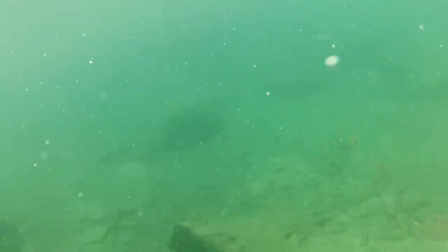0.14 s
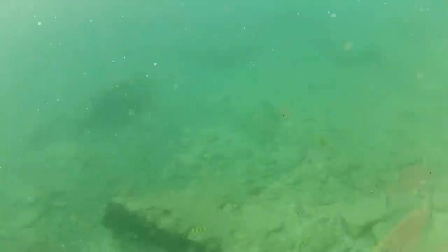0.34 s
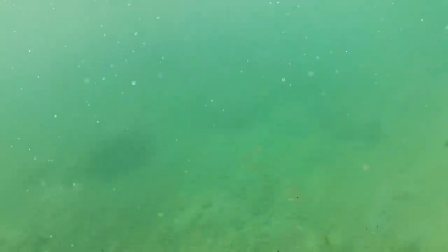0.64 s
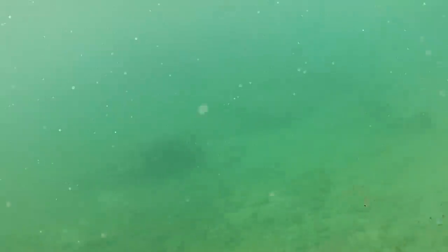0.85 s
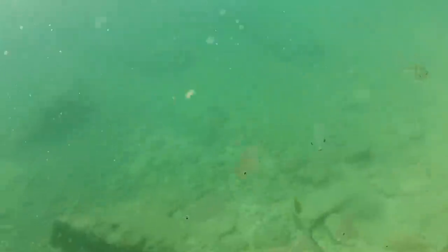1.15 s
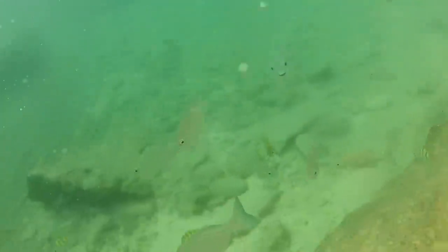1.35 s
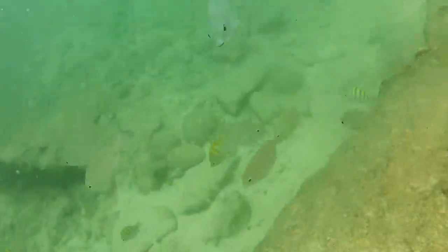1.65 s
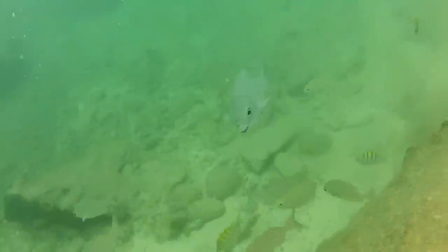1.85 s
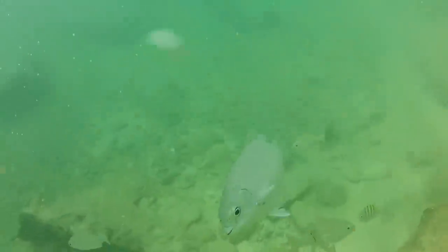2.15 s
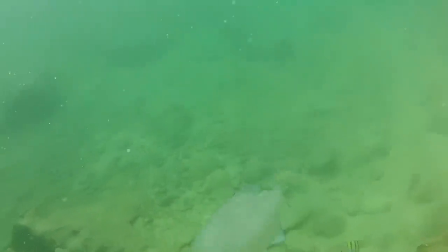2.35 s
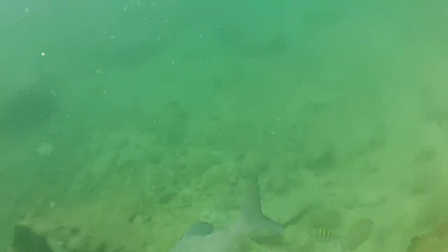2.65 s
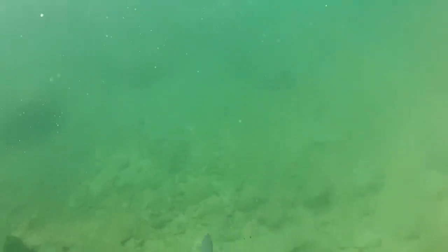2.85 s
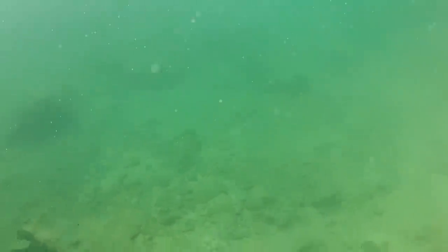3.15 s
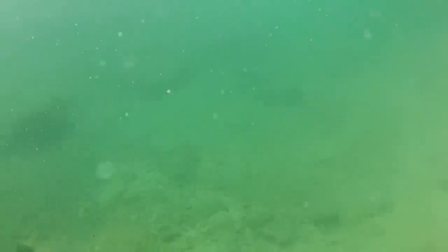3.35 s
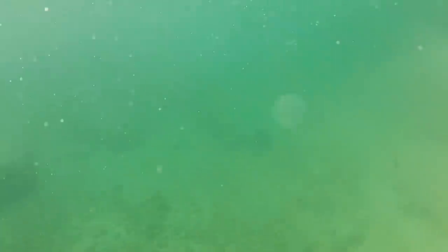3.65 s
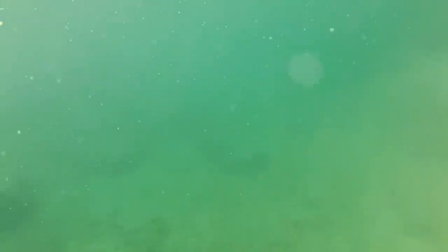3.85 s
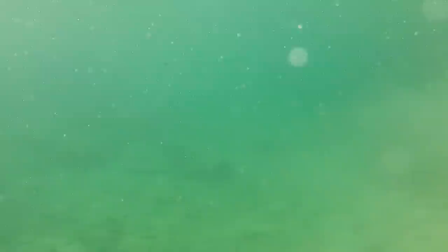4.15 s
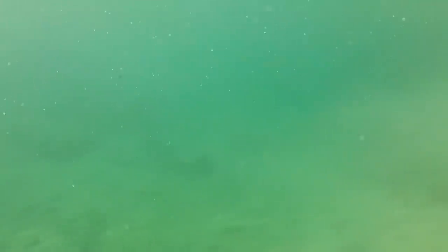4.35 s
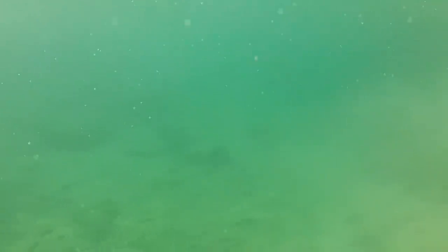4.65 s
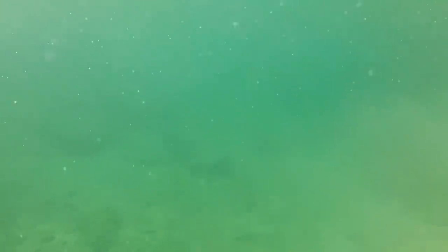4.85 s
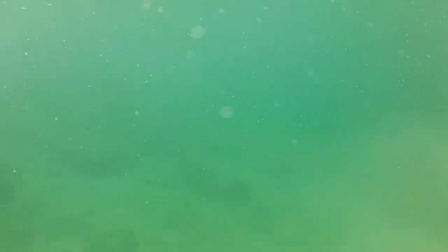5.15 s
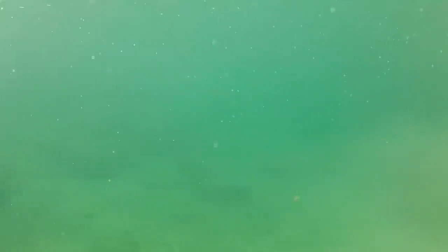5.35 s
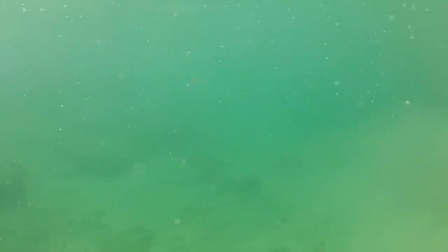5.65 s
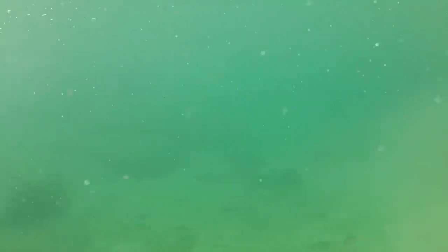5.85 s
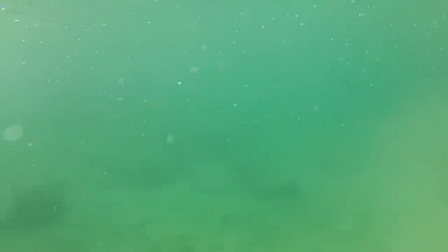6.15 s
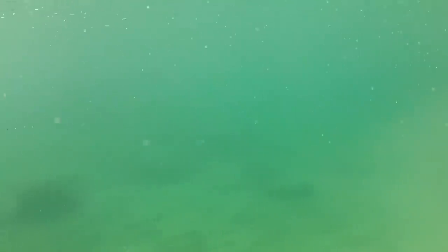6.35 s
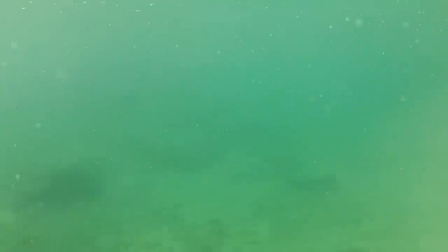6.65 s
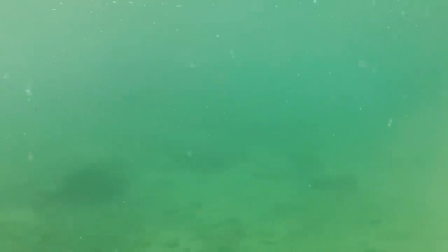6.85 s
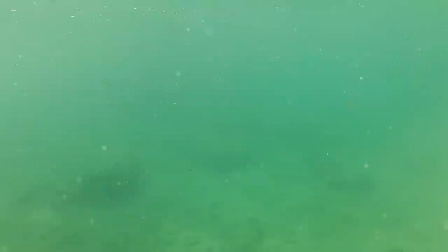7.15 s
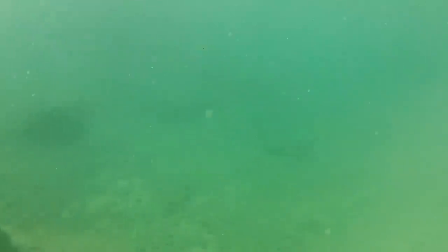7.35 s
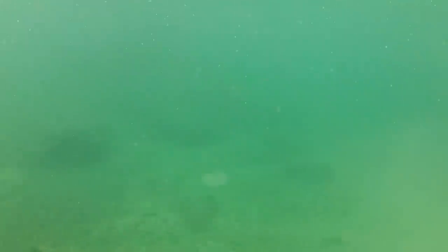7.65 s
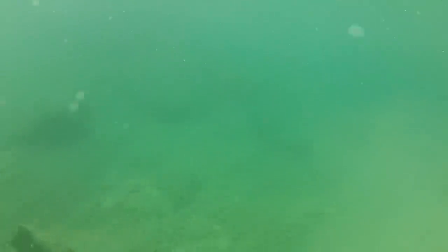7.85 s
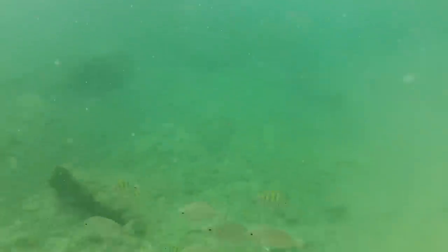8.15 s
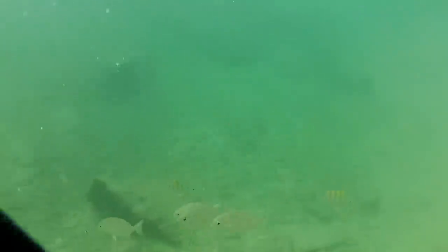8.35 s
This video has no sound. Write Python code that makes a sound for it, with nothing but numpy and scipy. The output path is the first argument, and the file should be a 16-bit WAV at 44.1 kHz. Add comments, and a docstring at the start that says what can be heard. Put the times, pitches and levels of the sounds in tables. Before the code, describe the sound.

Close, muffled handling of a sealed camera under water. Dull knocks on its plastic shell come in separate bursts, with finger rubs, tiny high ticks, brief skin squeaks and low surging water between them. A strong clatter comes near the middle, then softer bumps, and finally very loud, overloaded knocks with a hollow ringing handle. The built-in microphone sounds boxy and gritty over faint steady hiss.

```python
"""A sealed camera housing is handled under water: knocks ring its plastic shell as dying sines and a crack.
Rubbing fingers ring the same modes in uneven grains, wet skin squeaks, and a stiffer handle rings longer.
Water sloshes in low noise-driven modes, low dying sines thump, small sharp ticks snap in high rings.
Under it lies steady noise of the water and the microphone amplifier.
The recorder overloads, samples slowly and holds each value, which mirrors sound around its sampling rate."""
import sys
import numpy as np
from scipy import signal
from scipy.fft import rfft, irfft
from scipy.io import wavfile
from scipy.ndimage import uniform_filter1d

SR = 44100
rng = np.random.default_rng(int(sys.argv[2]) if len(sys.argv) > 2 else 0)


def file_out(sig):
    """Save sig as 16-bit WAV at sys.argv[1]."""
    # one column per channel
    cols = np.atleast_2d(sig).T
    # limit, then scale
    lim = np.clip(cols, -1, 1)
    pcm = np.round(lim * 32767).astype(np.int16)
    wavfile.write(sys.argv[1], SR, pcm)


N = 374409

# ringing modes of the plastic shell: pitch_hz, level_db, t60_s
SHELL = [(129.8, -2, 0.22), (250.6, -22.5, 0.14), (274.6, -1.5, 0.079), (424.7, -1, 0.067),
         (474.3, 1.5, 0.045), (564.6, -0.5, 0.066), (771.4, -2, 0.047), (975, -1, 0.062),
         (1091, 12.5, 0.028), (1257, 18, 0.015), (1690, 11.5, 0.027), (1864, 13, 0.015), (2050, 2.5, 0.025),
         (2244, 1.5, 0.048), (2505, -7.5, 0.0455), (3230, 3.5, 0.022), (3636, 0, 0.031),
         (4840, -12.5, 0.026), (5180, 0.5, 0.0076)]


def amp(db):
    """Amplitude ratio of a level in dB."""
    return 10 ** (np.asarray(db) / 20)


def evened(x):
    """Scale a signal to an RMS of one, so that a later factor sets its level."""
    return x / np.sqrt(np.mean(x ** 2) + 1e-20)


def read(points, hz):
    """Read a curve of (Hz, value) points, straight over log frequency."""
    f, value = np.transpose(points)
    return np.interp(np.log(hz + 1), np.log(f + 1), value)


def add(mix, start_s, sound):
    """Add a sound into the mix in place, cut off at its end."""
    part = mix[round(start_s * SR):][:len(sound)]
    part += sound[:len(part)]


def ring(modes, seconds, more_db=0, rise_turns=0.24, since=0):
    """Sum of dying sines; the contact is not instant, so each swells over its first rise_turns cycles."""
    hz, db, t60 = np.transpose(modes)[:, :, None]
    t = np.arange(round(seconds * SR)) / SR
    swell = np.sin(np.pi / 2 * np.minimum(hz * t / rise_turns, 1)) ** 2
    fade = amp(db + more_db - 60 * t / t60)
    return (fade * swell * np.sin(2 * np.pi * hz * (t + since))).sum(0)


def hiss():
    """Steady noise of the water and the microphone amplifier, coloured by a smooth spectrum."""
    # spectrum of the noise, relative: freq_hz, density_db (per Hz)
    colour = [(59, -27.5), (100, -10), (274, -9), (441, -23), (570, -21.5), (1040, -25.5), (2120, -27),
              (4340, -29), (5900, -36.5), (7670, -71.5), (13000, -120)]
    level_db = -67  # RMS
    spectrum = rfft(rng.standard_normal(N)) * amp(read(colour, np.fft.rfftfreq(N, 1 / SR)))
    return amp(level_db) * evened(irfft(spectrum, N))


def handling():
    """Skin slips over the shell in grains that ring its modes, damped by the grip; water rocks it below."""
    # the grip shifting and the water moving all along: time_s, rubbing_db, slosh_db
    hands = [(0.0, -63, -62), (0.3, -63, -52), (0.8, -63, -54.5), (1.0, -67, -55.5), (1.15, -55.5, -65),
             (1.41, -72.5, -54.5), (1.53, -45, -34), (1.7, -60, -47), (1.82, -65, -55), (2.04, -55.5, -62),
             (2.45, -68, -56), (3.0, -67.5, -63), (3.5, -53.5, -64), (3.8, -56.5, -58), (4.15, -66, -61),
             (4.9, -73, -63), (5.501, -64.5, -57.5), (5.9, -58.5, -60), (6.15, -76.5, -57.5),
             (6.33, -85, -63), (6.67, -60.5, -67.5), (6.82, -80, -61), (7.03, -56.5, -75),
             (7.21, -67.5, -56), (7.34, -58, -46), (7.79, -56, -51), (8.06, -61, -65)]
    # separate finger strokes: start_s, length_s, rubbing_db, grit_db
    strokes = [(0, 0.027, -54, -55.5), (0.238, 0.11, -62.5, -64.5), (0.393, 0.058, -61, -63.5),
               (0.527, 0.067, -63, -64.5), (0.732, 0.12, -53, -61.5), (1.072, 0.032, -58, -69),
               (1.246, 0.034, -62.5, -70), (1.495, 0.064, -49, -56.5), (1.639, 0.096, -41.5, -58),
               (1.715, 0.07, -39.5, -49.5), (2.573, 0.047, -57.5, -81), (3.299, 0.031, -50.5, -86),
               (3.404, 0.042, -51, -56.5), (3.538, 0.098, -37, -49.5), (4.005, 0.044, -71.5, -50.5),
               (4.376, 0.07, -60, -70.5), (5.42, .06, -60.5, -77), (5.635, 0.204, -61.5, -77),
               (5.985, 0.15, -61, -77), (7.248, 0.044, -52.5, -57.5), (7.297, 0.091, -48, -53),
               (7.427, 0.022, -62, -59.5), (7.901, 0.12, -68, -55.5)]
    # surges of water that rock the camera: start_s, length_s, slosh_db, shell_sway_db
    surges = [(0.0, 0.073, -47.5, -79), (0.3, 0.13, -60, -63), (0.75, 0.15, -44, -49),
              (0.95, 0.33, -50.5, -54.5), (1.34, 0.15, -43, -78), (1.52, .16, -55, -58),
              (2.03, 0.27, -54, -85), (3.1, 0.44, -45, -73), (3.35, 0.18, -65, -45.5),
              (3.58, 0.092, -55, -31.5), (3.73, 0.11, -48, -48), (3.84, 0.2, -64, -48),
              (4.18, 0.11, -53, -63.5), (4.36, 0.21, -54, -57), (4.95, 0.14, -56, -75.5),
              (5.08, 0.13, -71, -60), (5.43, 0.19, -68, -49.5), (5.62, 0.27, -66, -49),
              (5.98, .14, -67, -45.5), (6.24, .14, -47, -70.5), (6.46, .18, -51, -97.5),
              (6.6, 0.22, -62, -75), (6.95, 0.17, -65, -51), (7.12, 0.17, -56, -51.5),
              (7.22, 0.22, -42, -56), (7.69, 0.17, -45, -71), (7.9, 0.1, -47, -61)]
    # the camera bobbing in the water: pitch_hz, level_db, t60_s
    bobbing = [(45, -3, 0.12), (64, -6, 0.044)]
    grit_db, grit_slope = -33.5, 0.64  # grit of the grip follows its rubbing: offset + slope x rubbing
    sway_db = -12  # steady sway of the shell, under the slosh
    rub_upper_db = -3  # the palm mutes the highest of the rubbed modes
    slips_per_s = 1800

    time_s, *columns = np.transpose(hands)
    rub_db, slosh_db = (np.interp(np.arange(N) / SR, time_s, c) for c in columns)
    rub, grit = amp(rub_db), amp(grit_db + grit_slope * rub_db)
    slosh, sway = amp(slosh_db), amp(slosh_db + sway_db)
    for rows, first, second, taper in (strokes, rub, grit, .4), (surges, slosh, sway, .9):
        for start_s, length_s, first_db, second_db in rows:
            swell = signal.windows.tukey(round(length_s * SR), taper)
            add(first, start_s, amp(first_db) * swell)
            add(second, start_s, amp(second_db) * swell)

    # sparse slips of uneven strength, their level wandering slowly
    strength_db = 1.4 * np.minimum(rng.exponential(1, N), 4)
    slips = rng.standard_normal(N) * (rng.random(N) < slips_per_s / SR) * amp(strength_db)
    slips *= amp(2.5 * evened(uniform_filter1d(rng.standard_normal(N), 900)))
    water = rng.standard_normal(N)

    gripped = np.array(SHELL) * [1, 1, .6]  # the grip shortens every ring
    palm = gripped[1:7] + np.outer(gripped[1:7, 0] > 700, [0, rub_upper_db, 0])
    layers = [(rub, slips, palm), (grit, slips, gripped[7:17]), (sway, water, SHELL[:1]),
              (slosh, water, bobbing)]
    out = np.zeros(N)
    for level, drive, modes in layers:
        out += level * evened(signal.oaconvolve(drive, ring(modes, 0.57))[:N])
    return out


def ticks():
    """A snap a few milliseconds long in short high rings."""
    # sharp ticks: start_s, level_db, brightness_db, pitch_hz
    tick_list = [(0.0273, -48, -12, 2110), (0.1117, -51, -17, 2600), (0.467, -55.5, -3.5, 2180),
                 (0.6075, -56, -20, 2320), (0.984, -60, 0.5, 2550), (1.5403, -44, -2, 2170),
                 (2.0404, -50.5, -15, 2410), (3.0872, -34.5, -13, 2530), (3.414, -39, -20.5, 2020),
                 (3.5189, -54, -8, 2200), (3.706, -42.5, -9, 2510), (4.4552, -44.5, -19.5, 2670),
                 (5.6429, -24, -21.5, 2500), (6.7945, -35.5, -21.5, 2420), (7.4943, -51.5, -1.5, 2320),
                 (7.5734, -28, -28, 2290), (7.874, -51, -9.5, 2300), (7.8986, -37.5, -17, 2160),
                 (7.9487, -42.5, -11, 2150), (7.9678, -41.5, -12, 2230)]
    # rings of a tick: pitch_hz, level_db, t60_s
    tick_modes = np.array([(2290, -7, 0.03), (2540, 2, 0.018), (3430, 5, .012), (3620, 6.5, 0.0247),
                           (3890, 9, 0.0083), (4480, 4, 0.014)])
    listed_hz = 2548  # tick pitch at which the lower rings sit as listed
    out, high = np.zeros(N), tick_modes[:, 0] > 3000
    for start_s, level_db, bright_db, hz in tick_list:
        snap = .4 * rng.standard_normal(200) * amp(-60 * np.arange(200) / SR / .003)
        snap[0] = 1
        snap /= np.linalg.norm(snap)
        # pitch moves the lower rings, brightness lifts or lowers the upper ones
        modes = tick_modes * np.where(high[:, None], 1, [hz / listed_hz, 1, 1])
        rings = ring(modes, .06, np.where(high, bright_db, 0)[:, None], rise_turns=3)
        add(out, start_s, amp(level_db) * np.convolve(snap, rings))
    return out


def knocks():
    """Each blow chatters as dying re-contacts; where it lands sets which modes speak."""
    # knocks on the shell: start_s, blow_db, thud_db, upper_db, hardness_db, chatter_t60_s
    blows = [(0.521, -30, -13, -18, -37, 0.006), (0.817, -45, 28, -24, -6, 0.039),
             (1.372, -10, 3, -13, -29, 0.048), (1.425, -10, 1.5, -22, -29.5, 0.14),
             (1.587, -6, 1.5, -32, -26, 0.035), (1.607, -18, 8.5, -24, -37, 0.12),
             (2.081, -43, 6.5, -13, -17.5, 0.1), (3.617, -6.5, -13, -2, -20.5, 0.046),
             (3.632, -12, -31, -1, -18.5, 0.049), (3.757, -5.5, -2.5, 7.5, -16.5, 0.073),
             (3.772, -11, 2.5, 9, -19, 0.084), (3.822, -18, -8, -22, -28.5, 0.11),
             (3.903, -14.5, -34, -34, -34.5, 0.073), (3.993, -20, -9, 3.5, -30, 0.17),
             (4.988, -13, -5.5, -40, -26, 0.056), (5.025, -22.5, -21, -5, -25.5, 0.036),
             (5.127, -30.5, -14, -2, -25, 0.037), (5.163, -41, 13, -23.5, -24, 0.023),
             (5.185, -30.5, -6, -12, -27, 0.011), (5.208, -37, 9.5, -29, -26, 0.24),
             (5.267, -28, 2, -11, -42, 0.046), (5.442, -45.5, 14.5, -15, -37, 0.024),
             (6, -55, 26, -6, -26, 0.021), (6.259, -16.5, -0.5, -23.5, -21.5, 0.12),
             (6.279, -22.5, 3, -1, -16.5, 0.11), (6.283, -21.5, 0, -29, -43, 0.19),
             (6.511, -17, -6.5, -13, -26, 0.091), (6.562, -26.5, 3.5, -27, -31, 0.18),
             (6.652, -26.5, -5.5, -28, -31, 0.071), (6.709, -35.5, -6, -18, -30, 0.16),
             (6.773, -35, -5.5, -24, -42, 0.055), (6.945, -34, -3.5, -21, -46, 0.037),
             (7.29, -17, 4, -14, -25, 0.021), (7.661, -25.5, -38, 3, -13.5, 0.02),
             (7.717, -3.5, -39, 7.5, -10.5, 0.01), (7.734, -7, -30, 7, -18.5, 0.14),
             (7.797, -19, -40, 6.5, -30, 0.13), (7.916, -29, -35, -25, -12.5, 0.15),
             (8.073, -30.5, -23, -22, 7.5, 0.047), (8.078, 0.5, -6, -6, -17.5, 0.054),
             (8.118, -22.5, 5, 8, -5, 0.082), (8.152, -9, -17, -4, -8.5, 0.09),
             (8.2, -13, -15, -20, 0, 0.013), (8.216, -25, 8, 17, 2, 0.1),
             (8.264, -13, -7.5, -6, -8.5, 0.052), (8.292, -8.5, 3, -4, -7.5, 0.086),
             (8.323, -4.5, -42, -5, -13, 0.081), (8.396, -12, -32, 0, 1, 0.0096)]
    # a harder blow lifts the middle modes almost dB for dB and the top ones more: offset + slope x hardness
    middle_offset_db, middle_slope, edge_offset_db, edge_slope = -4.5, 0.92, 2, 1.63
    # only hard blows crack and wake the modes near 1 kHz
    crack_db, crack_slope, valley_db, valley_slope = -1.5, 1.4, -1, 1.3
    crack_t60_s, crack_band_hz = 0.02, (900, 2600)  # dense small modes heard as a burst
    # how much the grip and the spot change the modes from blow to blow (dB, fraction of pitch)
    spot_spread_db, detune_spread = 2, .015

    out, t, hz = np.zeros(N), np.arange(6000) / SR, np.transpose(SHELL)[0]
    crack_filter = signal.butter(2, crack_band_hz, "band", fs=SR)
    for start_s, blow_db, thud_db, upper_db, hard_db, chatter_t60_s in blows:
        middle_db = middle_offset_db + middle_slope * hard_db
        edge_db = edge_offset_db + edge_slope * hard_db
        spot_db, detune = rng.standard_normal((2, len(hz))) * [[spot_spread_db], [detune_spread]]
        modes = np.array(SHELL)
        modes[:, 0] *= 1 + detune

        # a strong first contact, then sparse weaker ones
        strength, chance = rng.standard_normal((2, len(t)))
        hits = strength * (chance > 1.9) * amp(-60 * t / chatter_t60_s)
        hits[0] = -3.2
        hits /= np.linalg.norm(hits)

        # level of the modes over frequency for this spot (Hz, dB)
        place = [(240, thud_db), (400, 0), (580, 0.0017), (780, upper_db),
                 (1030, valley_db + valley_slope * hard_db), (1200, middle_db), (1700, middle_db),
                 (2300, hard_db), (2600, hard_db), (3200, edge_db)]
        shell = ring(modes, 0.43, (read(place, hz) + spot_db - 9.0)[:, None], rise_turns=1.27)
        crack = evened(signal.lfilter(*crack_filter, rng.standard_normal(len(t))))
        add(shell, 0, crack * amp(crack_db + crack_slope * hard_db - 60 * t / crack_t60_s))
        add(out, start_s, amp(blow_db) * signal.fftconvolve(hits, shell))
    return out


def thumps():
    """Low thumps: shoves swing slowly near 50 Hz, and two hard hits give a short, loud 200 Hz pulse."""
    # thumps: start_s, level_db, pitch_hz, t60_s
    thump_list = [(1.515, -12.5, 42.3, 0.22), (1.531, -25, 44, 0.087), (3.25, -17, 65, 0.065),
                  (3.357, -8, 51, 0.085), (3.62, -31, 48.9, 0.18), (7.389, -27, 49, 0.092),
                  (8.198, 19, 190, 0.0098), (8.398, 12.5, 232, 0.0099)]
    out = np.zeros(N)
    for start_s, level_db, hz, t60_s in thump_list:
        # the minus sign starts each one with a pull
        add(out, start_s, -ring([(hz, level_db, t60_s)], 0.22, rise_turns=0.65))
    return out


def handle():
    """A stiffer part with longer, cleaner rings; each blow feeds the swing already going."""
    # blows that set the handle ringing: start_s, low_mode_db, main_mode_db, high_mode_db
    handle_blows = [(3.645, -55, -45, -26.5), (8.163, -40, -35, -26), (8.201, -49, -11, -24.5),
                    (8.263, -28, -16, -19), (8.299, -27, -12.5, -22.5), (8.325, -16.5, -20, -42),
                    (8.402, -16.5, -22, -29.5)]
    # modes of the handle: pitch_hz, level_db, t60_s
    handle_modes = [(153, -15, .4), (343, -4.5, 0.29), (666, -2.5, 0.16)]
    out = np.zeros(N)
    for start_s, *mode_db in handle_blows:
        # "since" keeps every blow in phase with the same running swing
        add(out, start_s, ring(handle_modes, .5, np.array(mode_db)[:, None], rise_turns=1.2, since=start_s))
    return out


def squeaks():
    """Wet skin sticks and slips in step with one mode: short swelling tones with an unsteady grip."""
    # squeaks: start_s, length_s, pitch_hz, level_db
    squeak_list = [(3.997, .05, 402, -18), (7.338, .05, 584, -31), (7.34, .025, 1240, -38),
                   (7.742, .095, 441, -27), (7.925, .085, 601, -37)]
    out = np.zeros(N)
    for start_s, length_s, hz, level_db in squeak_list:
        t = np.arange(round(length_s * SR)) / SR
        wander = evened(np.convolve(rng.standard_normal(9000), np.hanning(200), "same"))
        grip = amp(2 * wander[:len(t)])
        tone = np.sin(2 * np.pi * hz * t)
        add(out, start_s, amp(level_db) * grip * np.hanning(len(t)) * tone)
    return out


def scene():
    """All sources summed into one microphone channel."""
    return (hiss() + handling() + ticks() + knocks() + thumps() + handle() + squeaks())[None]


def record(dry):
    """Hard overload, slow sampling with hold, then the band limit."""
    # the recorder's treble fades before its edge: freq_hz, level_db
    treble = [(14600, 0.5), (15400, -6), (16500, -22)]
    hold_hz, edge_hz = 12000, 16600  # slow sampling rate, upper band limit
    hz = np.fft.rfftfreq(N, 1 / SR)
    x = np.clip(dry, -.64, .64)
    before = signal.firwin(255, hold_hz / 2, window=("kaiser", 7), fs=SR)
    x = signal.oaconvolve(x, before[None], "same")
    # sampling copies the spectrum upward
    x = x * (1 + 2 * np.cos(2 * np.pi * hold_hz * np.arange(N) / SR))
    held = np.sinc(hz / hold_hz)  # holding each value droops it
    x = irfft(rfft(x) * held * amp(read(treble, hz)), N)
    after = signal.firwin(255, edge_hz, window=("kaiser", 9), fs=SR)
    return signal.oaconvolve(x, after[None], "same")


dry = scene()
out = record(dry)
file_out(out)
```